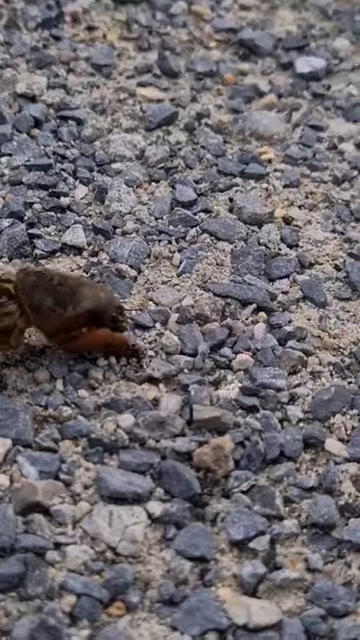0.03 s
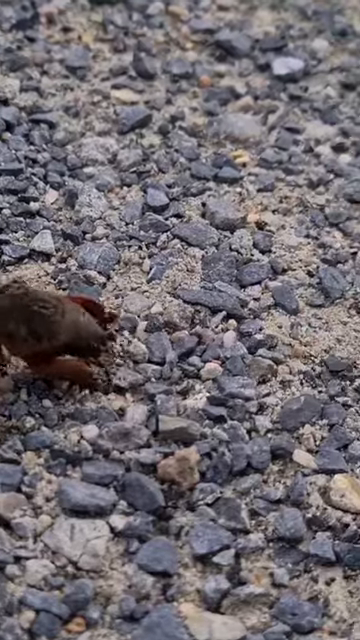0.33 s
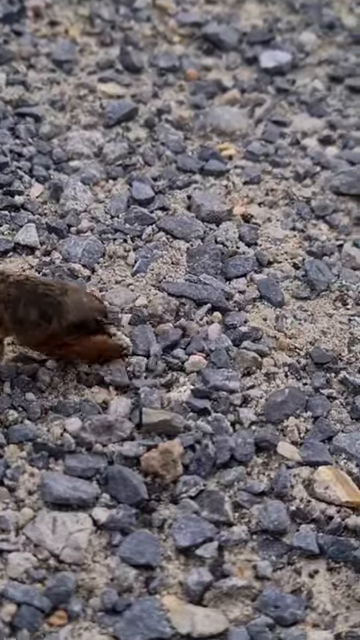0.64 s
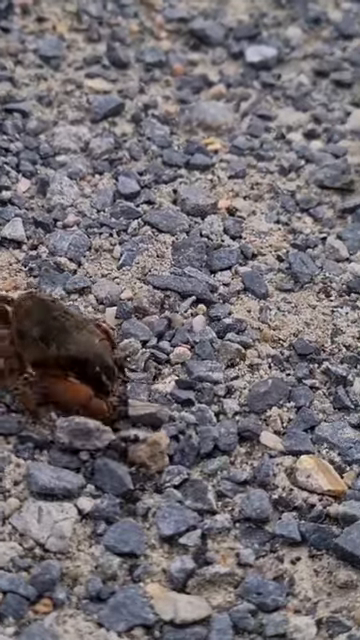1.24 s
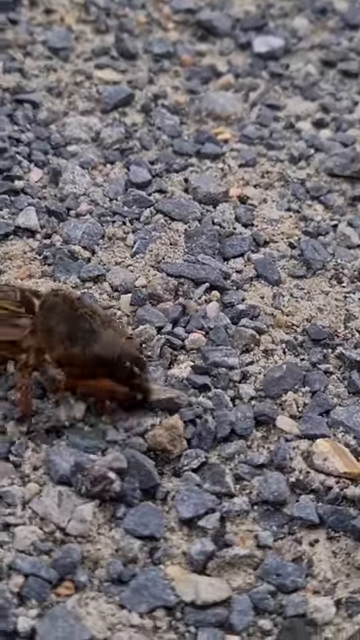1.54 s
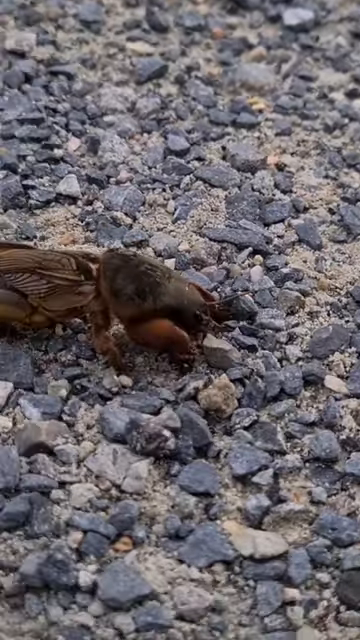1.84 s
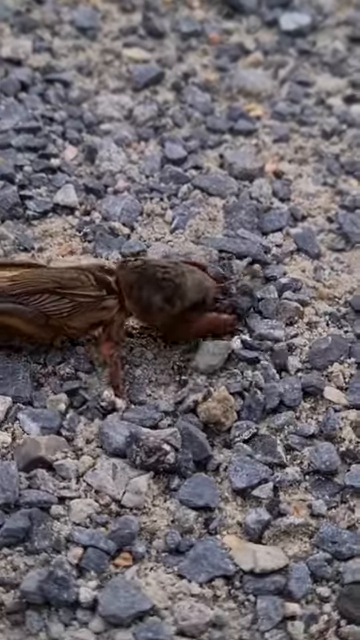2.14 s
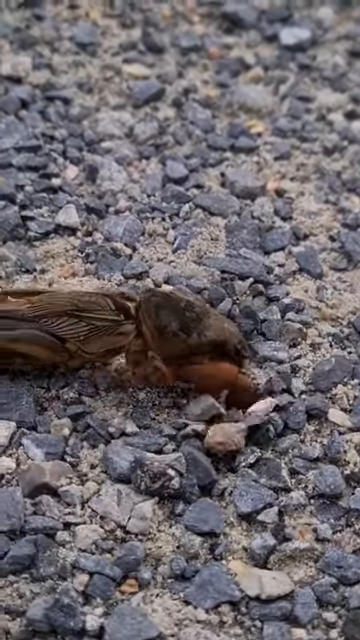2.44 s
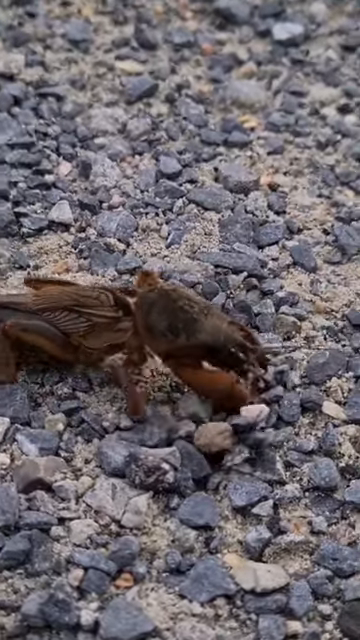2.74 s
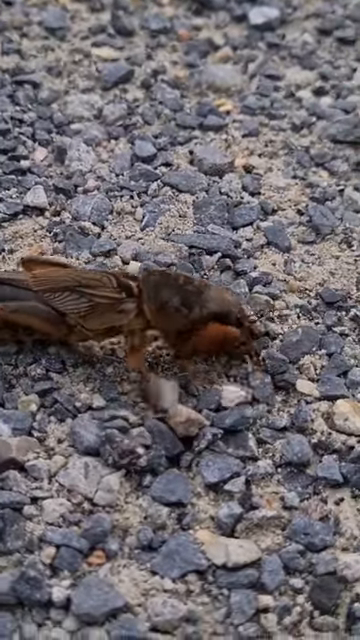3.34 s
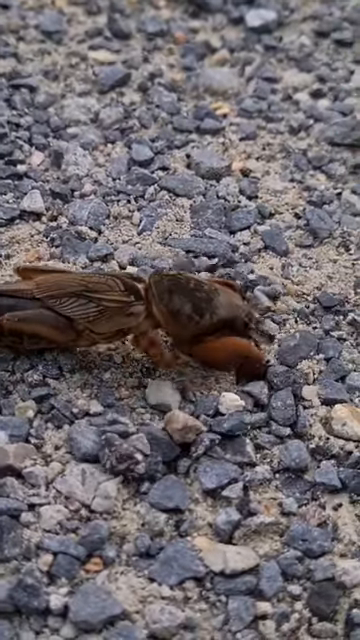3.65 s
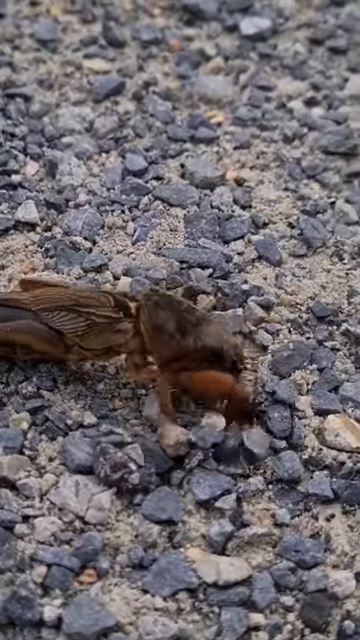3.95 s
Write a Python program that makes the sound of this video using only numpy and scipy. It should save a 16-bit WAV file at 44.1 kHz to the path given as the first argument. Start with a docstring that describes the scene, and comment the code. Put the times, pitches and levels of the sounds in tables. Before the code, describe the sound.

A cricket chirps close by outdoors, high and shrill, about sixteen chirps a second. The first train runs from 0.3 to 1.5 seconds, the second from 2.0 to 2.6, the third from 3.0 to 3.8. Its legs scratch very faintly in grit, most near 2.6 seconds. Farther crickets chirp softly throughout, over a thin hiss and the low rumble and faint hum of distant traffic.

```python
"""A cricket chirps close by on a gravel path in three trains, about 16 chirps a second.
It stridulates: each chirp is two wing strokes, each a short run of tooth clicks that excite the
wing's resonances near 10 kHz. Its legs scratch faintly in the grit. More crickets chirp farther off,
over the rumble and faint hum of distant traffic and a thin hiss."""
import sys
import numpy as np
from scipy import signal
from scipy.fft import rfft, irfft
from scipy.io import wavfile
from scipy.ndimage import uniform_filter1d, map_coordinates

SR = 44100
rng = np.random.default_rng(int(sys.argv[2]) if len(sys.argv) > 2 else 0)


def generate_wav(signal):
    """Clip the signal to [-1, 1] and save it as 16-bit WAV at the path in sys.argv[1]."""
    frames = np.transpose(np.atleast_2d(signal))
    scaled = np.clip(frames, -1, 1) * 32767
    pcm = np.round(scaled).astype(np.int16)
    wavfile.write(sys.argv[1], SR, pcm)


N = 176400
T = np.arange(N) / SR
HZ = np.fft.rfftfreq(N, 1 / SR)
TOOTH_JITTER = .08  # relative scatter of the tooth spacing


def near_cricket():
    """Stridulation in stroke pairs, placed by interaural time and level differences."""
    # chirps: first stroke t/s, its relative level/dB, delay to return stroke t/s, its relative level/dB
    chirps = [(0.3294, -36.8, 0.0174, -37.5), (0.3902, -39.5, 0.0203, -39.4),
              (0.4519, -39.9, 0.0193, -37.9), (0.5141, -38.7, 0.019, -36.6), (0.5746, -37.2, 0.0168, -38.3),
              (0.6356, -36.7, 0.0195, -36.8), (0.6984, -37.9, 0.0183, -39.1), (0.7606, -37.0, 0.018, -36.9),
              (0.8214, -37.7, 0.0186, -36.8), (0.8853, -38.7, 0.0172, -41.4), (0.948, -36.9, 0.0178, -36.8),
              (1.01, -35.8, 0.0178, -35.7), (1.0696, -35.8, 0.0191, -36.2), (1.1321, -36.5, 0.0195, -37.5),
              (1.195, -37.8, 0.0197, -37.7), (1.2581, -40.0, 0.019, -38.5), (1.319, -38.2, 0.0187, -41.3),
              (1.3814, -38.2, 0.0193, -38.5), (1.4438, -38.7, 0.0177, -38.6),
              (1.5115, -38.3, 0.0194, -39.8), (2.0099, -41.0, 0.0201, -41.3),
              (2.0682, -38.6, 0.0179, -38.6), (2.1287, -38.0, 0.0188, -37.2),
              (2.1867, -38.1, 0.0191, -35.6), (2.247, -36.7, 0.0191, -40.1), (2.3079, -36.9, 0.0191, -37.4),
              (2.3699, -37.9, 0.019, -38.1), (2.4311, -37.7, 0.0192, -39.3), (2.4926, -37.6, 0.0186, -39.0),
              (2.5564, -37.7, 0.019, -37.6), (2.6203, -38.1, 0.019, -38.3), (3.0352, -42.3, 0.0215, -42.7),
              (3.0921, -37.8, 0.0178, -39.0), (3.15, -37.9, 0.0185, -39.2), (3.2084, -38.1, 0.0178, -37.8),
              (3.2668, -38.0, 0.0177, -37.0), (3.3265, -36.6, 0.0167, -38.3),
              (3.3861, -38.8, 0.0187, -38.0), (3.4449, -37.9, 0.0177, -37.5),
              (3.5028, -37.8, 0.0182, -39.9), (3.5629, -37.9, 0.0172, -37.5),
              (3.6224, -38.5, 0.0177, -37.4), (3.6814, -38.4, 0.0184, -38.6),
              (3.7408, -38.6, 0.0208, -39.5), (3.8012, -39.1, 0.0199, -39.1)]
    # first and return stroke: swell half-width t/s, nominal tooth rate f/Hz, gain/dB
    strokes = [(.0020, 540, .5), (.0031, 575, .5)]
    # interaural difference: t/s, left minus right level/dB
    pan = [(0.32, -2), (0.39, -1.5), (1.43, -1), (1.59, -1), (2.82, 0.5), (3.83, -2.5)]
    left_lag_s = .00031
    ears = np.zeros((2, N))
    for start, first_db, gap, return_db in chirps:
        pair = zip((start, start + gap), (first_db, return_db), strokes)
        for centre, db, (width_s, tooth_hz, gain_db) in pair:
            for ear, lag, sound in zip(ears, (left_lag_s, 0), wing_stroke(width_s, tooth_hz)):
                add(ear, centre + lag - len(sound) / SR / 2, amp(db + gain_db) * sound)
    ears *= amp(level_curve(pan) * np.array([[.5], [-.5]]))
    surroundings = amp(-17) * reverberate(ears[1], t60=.45)
    return amp(-3.5) * (ears + surroundings)


def wing_stroke(width_s, tooth_hz, size=1764, count=25):
    """Impulse excitation: tooth clicks ring the wing's modes, just after friction noise sets in."""
    # resonances of the wing: f/Hz, relative level/dB
    wing_modes = [(3000, -55), (4500, -52), (5400, -40), (5900, -28), (6300, -23), (6700, -36),
                  (7030, -28.5), (7500, -40), (8600, -31), (9200, -20), (9540, -7), (9740, -15), (9980, -2),
                  (10250, 1.5), (10480, -7), (10700, -16), (10900, -6), (11120, -16), (11600, -25),
                  (13000, -37), (15500, -36)]
    # friction spectrum of the scraping: f/Hz, relative level/dB
    friction = [(1500, -18.5), (2500, -9.5), (4300, -33.5), (5300, -16), (6200, -5.5), (7000, -12.5),
                (7700, -8), (9200, -6.5), (10700, 6), (12300, 0), (13200, -7), (14200, -1), (15500, -5)]
    click_lead_s, scrape_lead_s, pitch_slide = .0009, .002, .016
    middle = size // 2
    t = (np.arange(size) - middle) / SR
    steps = np.cumsum(1 + TOOTH_JITTER * rng.standard_normal(count))
    steps = steps - steps[count // 2] + rng.uniform(-.5, .74)
    tooth_s = steps / (tooth_hz * np.exp(.06 * rng.standard_normal()))
    swell = np.exp(-abs(tooth_s / width_s) ** 1.7 / 2)
    samples = np.round((tooth_s - click_lead_s) * SR).astype(int) + middle
    clicks = np.zeros(size)
    clicks[np.clip(samples, 0, size - 1)] = swell * amp(1.8 * rng.standard_normal(count))
    gravel_echo = amp(-13) * reverberate(clicks, t60=.012)[:, :size]
    ringing = excite(clicks + gravel_echo, wing_modes)
    # the pitch differs a little between strokes and slides down through each
    pitch_ratio = 1 + .003 * rng.standard_normal() - pitch_slide * np.tanh(t / width_s / 2)
    place = np.cumsum(pitch_ratio)
    ringing = np.array([map_coordinates(ear, [place - place[middle] + middle], order=5) for ear in ringing])
    scrape_swell = np.exp(-((t + scrape_lead_s) / (1.8 * width_s)) ** 2 / 2)
    scrape = colour(rng.standard_normal((2, size)) * scrape_swell, friction)
    return (ringing + amp(-11.5 + 2 * rng.standard_normal()) * scrape) / 2


def leg_scratching():
    """Friction noise: the legs rub through the grit in small uneven clumps."""
    # spectrum of the grit: f/Hz, relative level/dB
    spectrum = [(1000, -14), (2300, 0.5), (3000, 3.5), (3700, 6.5), (4300, -8), (8000, -47)]
    # strength of the scratching: t/s, level/dB
    levels = [(.3, -84), (1.7, -81), (2.05, -75.5), (2.2, -77), (2.45, -76.5), (2.6, -68.5), (2.7, -75.5),
              (3.0, -77), (3.15, -78), (4, -76)]
    clumps = rng.standard_normal((2, N)) * amp(4 * wander(60))
    return colour(clumps, spectrum) * amp(level_curve(levels))


def far_crickets(gap_s=.019, width_s=.003, tooth_hz=560):
    """Stridulation at a distance: tooth clicks drive a gliding resonance, smeared by reverberation."""
    # per cricket: one chirp's t/s, chirp rate f/Hz, pitch f/Hz, sweep/(Hz/s), bandwidth/Hz, level/dB
    crickets = [(0.023, 17.09, 9310, -90000, 2000, -63.5), (0.027, 22, 11240, -50000, 1000, -63.5),
                (0.024, 33, 10300, -30000, 1800, -76.5)]
    # band they sing in: f/Hz, relative level/dB
    band = [(7000, -18), (8800, 0), (11500, 0), (13000, -14)]
    ears = np.zeros((2, N))
    for first_s, rate, hz, sweep, width_hz, db in crickets:
        from_chirp = (T - first_s + .001 * wander(rate) + gap_s) % (1 / rate) - gap_s
        from_stroke = np.where(from_chirp > gap_s / 2, from_chirp - gap_s, from_chirp)
        teeth_passed = np.cumsum(tooth_hz * (1 + TOOTH_JITTER * wander(tooth_hz))) / SR
        clicks = np.diff(np.floor(teeth_passed), prepend=0)
        rasp = clicks * np.exp(-(from_stroke / width_s) ** 2 / 2)
        song = colour(resonate(rasp, hz + sweep * from_stroke, width_hz), band)
        ears += amp(db) * unit(song + amp(-2) * reverberate(song, t60=.06))
    return ears


def insect_chorus():
    """Incoherent summation: the farthest insects blend into a throbbing, grainy hiss."""
    # spectral density of the chorus: f/Hz, relative level/dB
    spectrum = [(3000, -55), (4500, -28), (6000, -15), (7800, -18), (8600, -12.5), (9500, -2), (10200, 1),
                (11300, -8), (12000, -8), (12800, -12.5), (13600, -11.5), (15500, -19.5)]
    grains = rng.standard_normal((2, N)) * amp(2 * wander(1200))
    throb = amp(2.5 * wander(56))
    return amp(-56) * unit(colour(grains, spectrum) * throb)


def traffic_rumble():
    """Long waves from distant traffic reach both ears almost coherently, at an uneven level."""
    # spectral density of the rumble: f/Hz, relative level/dB
    spectrum = [(12, -25), (25, -14), (36, -3), (48, -6), (68, 2), (85, -3), (102, -4.5), (130, -20),
                (220, -36), (600, -60)]
    # swells and dips: t/s, relative level/dB
    levels = [(0.32, -43.5), (0.39, -60), (0.48, -47), (0.65, -56.5), (0.81, -53), (0.88, -61), (0.91, -49),
              (1.23, -58), (1.26, -52), (1.45, -54), (1.81, -52.5), (1.88, -60), (1.93, -53.5), (2.97, -53),
              (3.1, -61), (3.13, -51), (3.95, -53), (4.0, -45.5)]
    noise = colour(correlate(*rng.standard_normal((2, N)), coherence=.96), spectrum)
    running_rms = np.sqrt(uniform_filter1d((noise ** 2).mean(0), size=SR // 4))
    return noise / running_rms * amp(1.5 + level_curve(levels))


def road_noise():
    """Broadband noise of traffic and air, whose interaural coherence falls towards the treble."""
    # spectral density of traffic and air: f/Hz, relative level/dB
    spectrum = [(30, -14.5), (130, 2.5), (250, -1.5), (400, -5), (650, -10), (900, -17.5), (1150, -14),
                (1650, -22), (2500, -20), (3600, -26), (4300, -38), (5500, -61.5), (16000, -36)]
    # likeness of the two ears: f/Hz, coherence
    coherence = [(60, 0.82), (130, 0.93), (290, 0.81), (640, 0.38), (1400, 0.047), (16000, 0.023)]
    white = rfft(rng.standard_normal((2, N)))
    noise = irfft(correlate(*white, read_spectrum(coherence, HZ)), N)
    return colour(noise, spectrum) * amp(-60 + wander(13))


def engine_hum(hz=249.4, waver_hz=1.95):
    """Frequency and amplitude modulation: a distant engine's tone wavers, comes and goes."""
    # strength of the hum: t/s, relative level/dB
    levels = [(.3, -70), (.55, -78), (.65, -63.5), (.85, -65), (1.0, -80.5), (1.35, -86), (1.55, -66.5),
              (1.8, -80.5), (2.05, -64), (2.3, -88.5), (4, -71.5)]
    phase = 2 * np.pi * np.cumsum(hz + waver_hz * wander(9)) / SR
    return unit(np.sin(phase)) * amp(level_curve(levels))


def excite(x, spectrum, size=2048):
    """Minimum-phase response: each click starts suddenly and decays with this spectrum; rms 1."""
    log_gain = np.log(amp(read_spectrum(spectrum, abs(np.fft.fftfreq(size, 1 / SR)))))
    response = np.fft.ifft(np.exp(np.conj(signal.hilbert(log_gain)))).real
    return unit(signal.fftconvolve(x, response[None], axes=1)[:, :x.shape[1]])


def resonate(x, hz, width_hz):
    """Double-pole resonance whose centre follows the curve hz."""
    carrier = np.exp(2j * np.pi * np.cumsum(hz) / SR)
    r = np.exp(-np.pi * width_hz / SR)
    return (carrier * signal.lfilter([(1 - r) ** 2], [1, -2 * r, r * r], x / carrier)).real


def reverberate(x, t60):
    """Diffuse reflections, different at each ear, decay by 60 dB in t60 seconds."""
    t = np.arange(0, t60, 1 / SR)
    tail = rng.standard_normal((2, SR))[:, :len(t)] * amp(-60 * t / t60)
    tail /= np.linalg.norm(tail, axis=1)[:, None]
    return signal.fftconvolve(x[None], tail, axes=1)[:, :N]


def colour(x, spectrum):
    """Zero-phase filtering with the given spectrum; rms 1."""
    size = x.shape[-1]
    gain = amp(read_spectrum(spectrum, np.fft.rfftfreq(size, 1 / SR)))
    return unit(irfft(rfft(x) * gain, size))


def correlate(a, b, coherence):
    """Partial coherence: two independent noises mix into a left and right pair."""
    return np.array([a, coherence * a + np.sqrt(1 - coherence ** 2) * b])


def wander(hz):
    """Random fluctuation: noise low-passed at about hz; rms 1."""
    return unit(irfft(rfft(rng.standard_normal(N)) / (1 + (HZ / hz) ** 2) ** 2, N))


def read_spectrum(points, hz):
    """Interpolation on a logarithmic frequency axis."""
    f, value = np.transpose(points)
    return np.interp(np.log(hz + 1), np.log(f + 1), value)


def level_curve(points):
    """Linear interpolation of a level over time."""
    return np.interp(T, *np.transpose(points))


def add(mix, start_s, sound):
    """Superposition of a sound from start_s on."""
    part = mix[max(round(start_s * SR), 0):][:len(sound)]
    part += sound[:len(part)]


def amp(db):
    """Decibels to amplitude ratio."""
    return 10 ** (np.asarray(db) / 20)


def unit(x):
    """Normalisation to rms 1."""
    return x / np.sqrt(np.mean(x ** 2) + 1e-20)


def scene():
    """Superposition of all sources; road noise and hum are 1 dB weaker on the left."""
    insects = near_cricket() + far_crickets() + insect_chorus()
    traffic = traffic_rumble() + (road_noise() + engine_hum()) * amp([[-1], [0]])
    return insects + traffic + leg_scratching()


def record(dry):
    """Gating and band limiting: a quick fade-in after a moment of silence, then a low-pass filter."""
    start_s, fade_s, cutoff_hz = .2975, .033, 15620
    fade_in = np.clip((T - start_s) / fade_s, 0, 1)
    low_pass = signal.firwin(511, cutoff_hz, window=("kaiser", 9), fs=SR)
    return signal.oaconvolve(dry * fade_in, low_pass[None], "same")


dry = scene()
out = record(dry)
generate_wav(out)
```